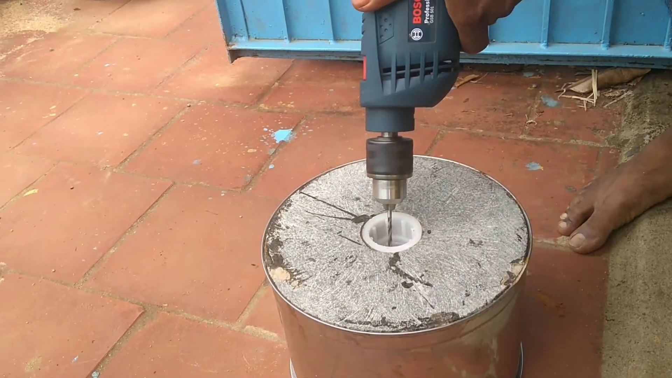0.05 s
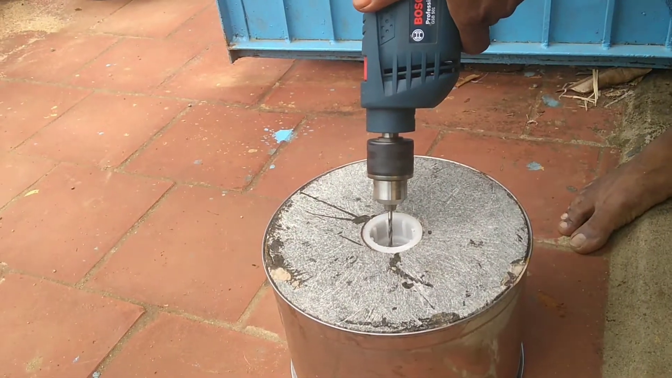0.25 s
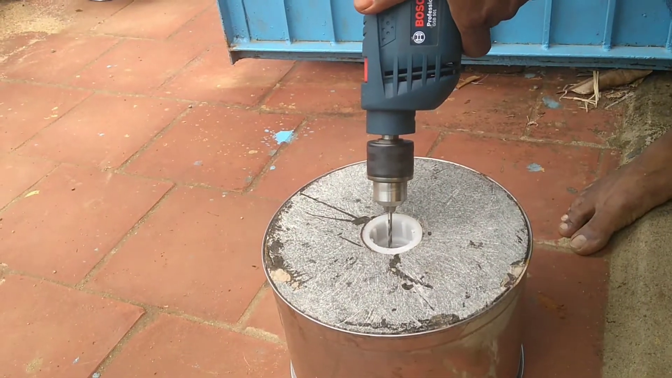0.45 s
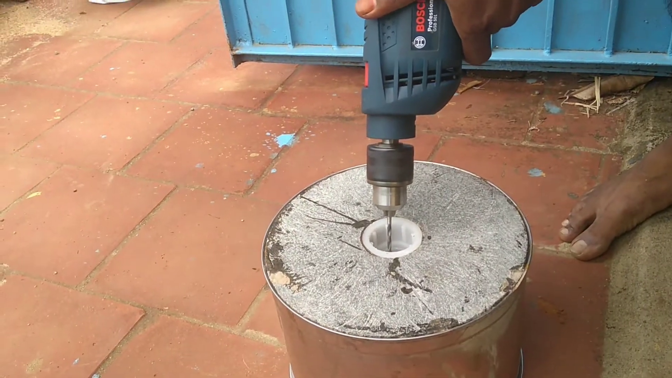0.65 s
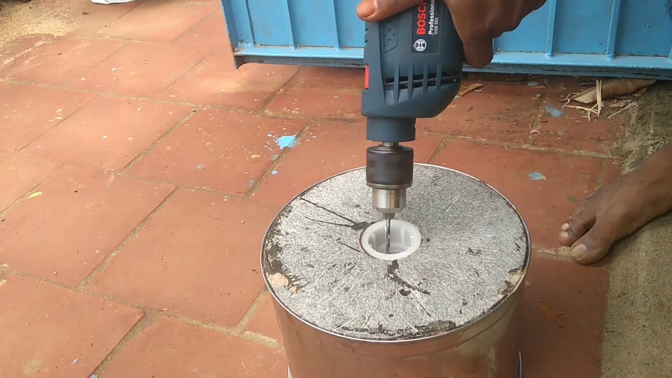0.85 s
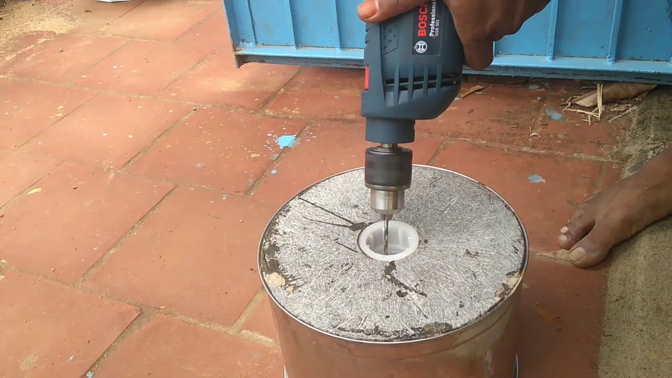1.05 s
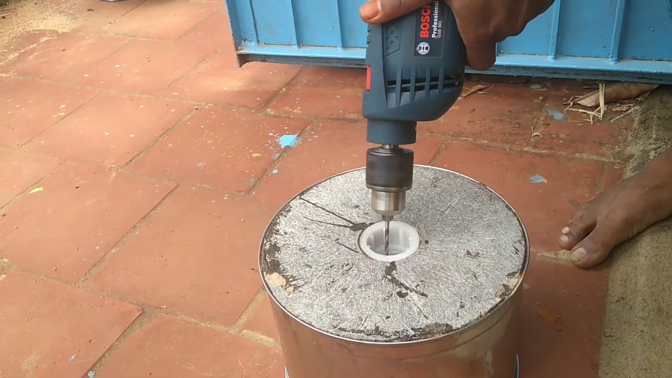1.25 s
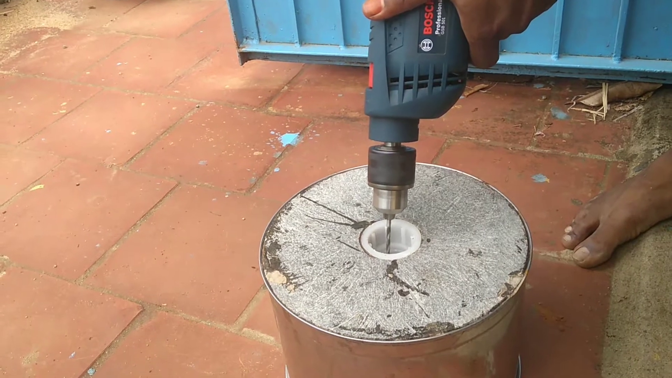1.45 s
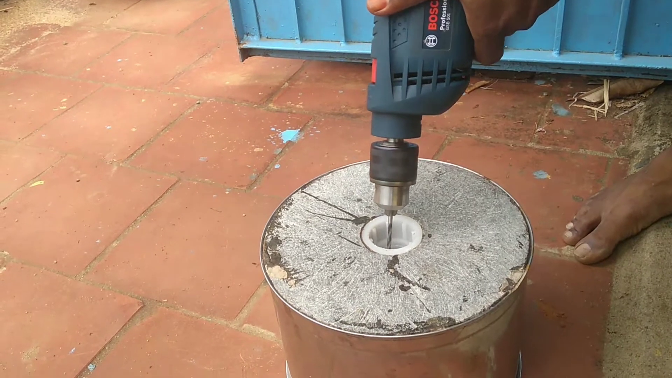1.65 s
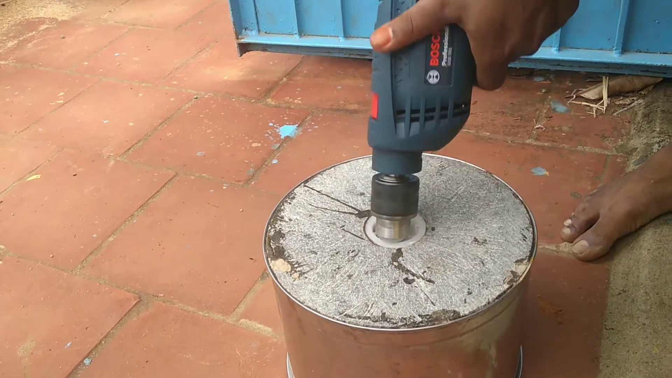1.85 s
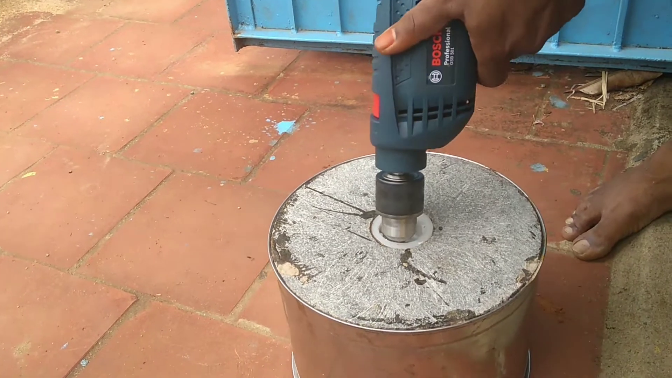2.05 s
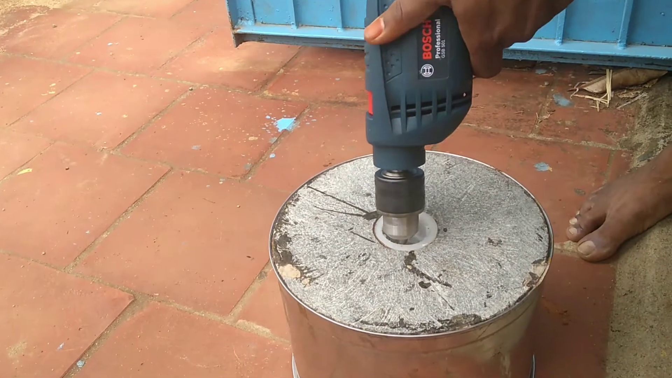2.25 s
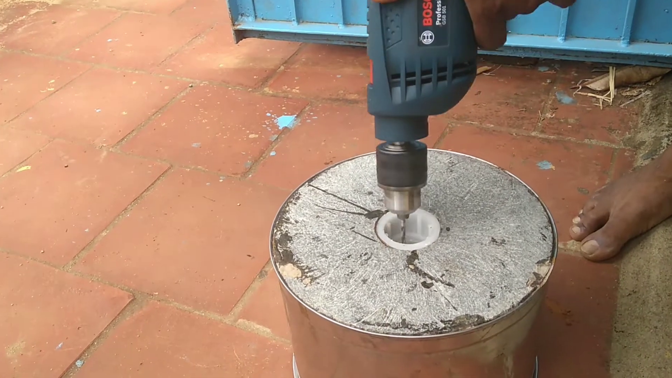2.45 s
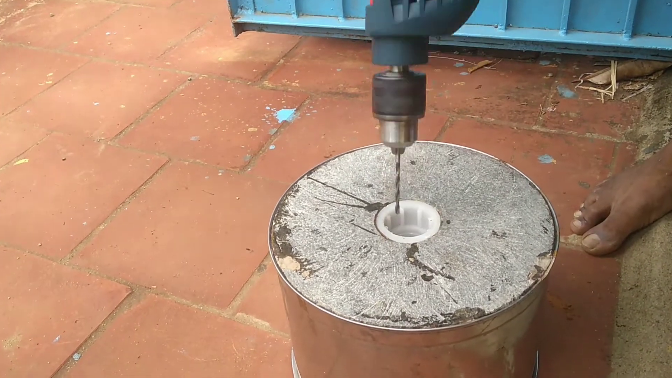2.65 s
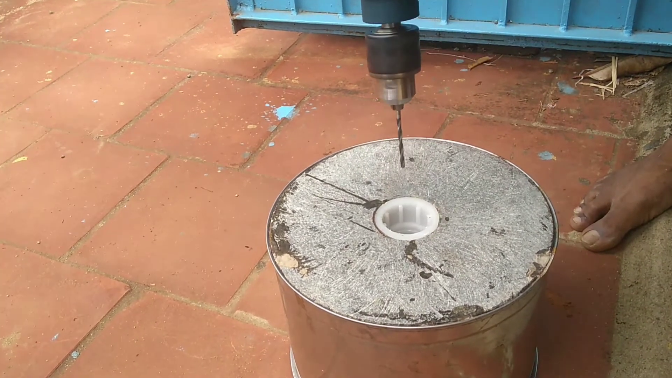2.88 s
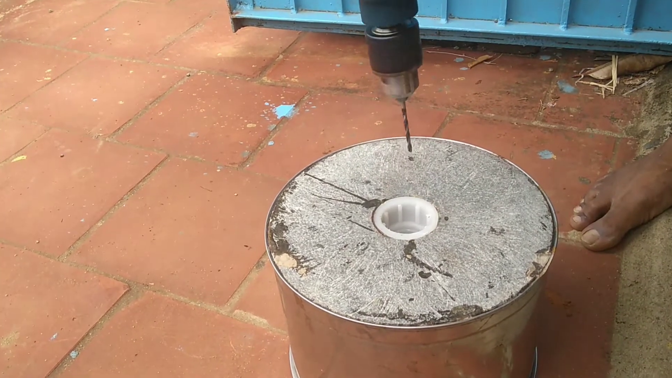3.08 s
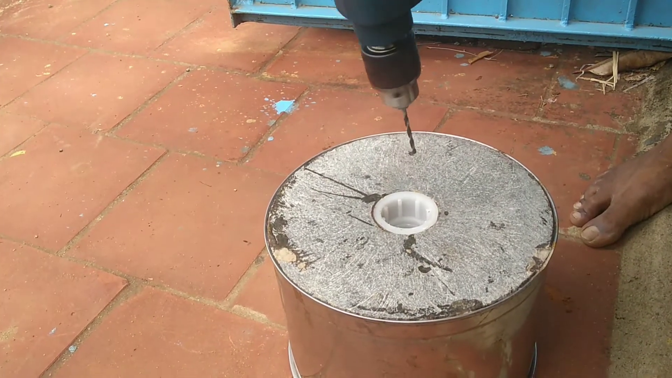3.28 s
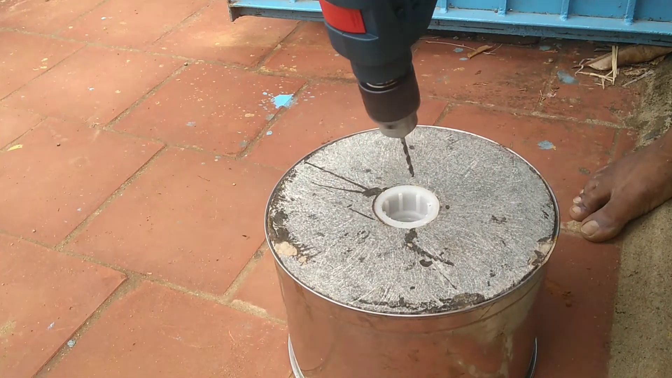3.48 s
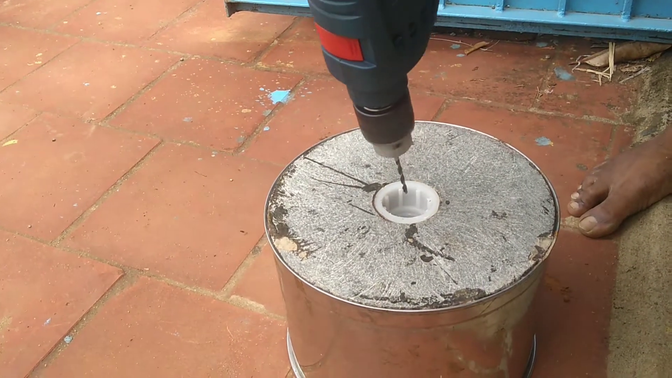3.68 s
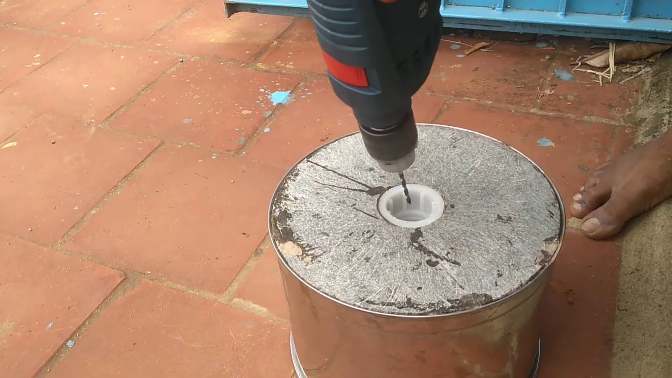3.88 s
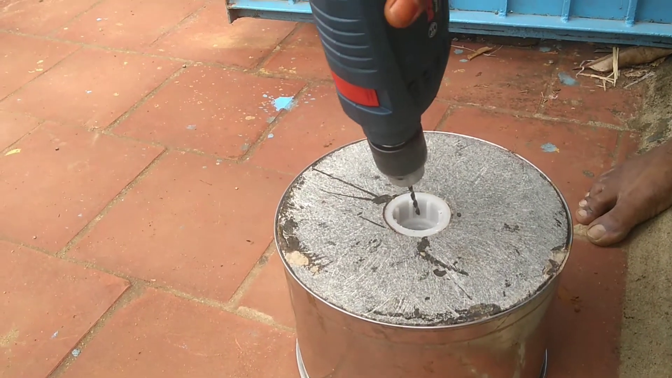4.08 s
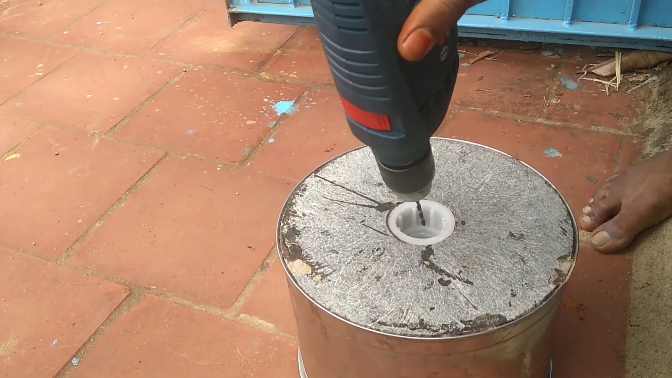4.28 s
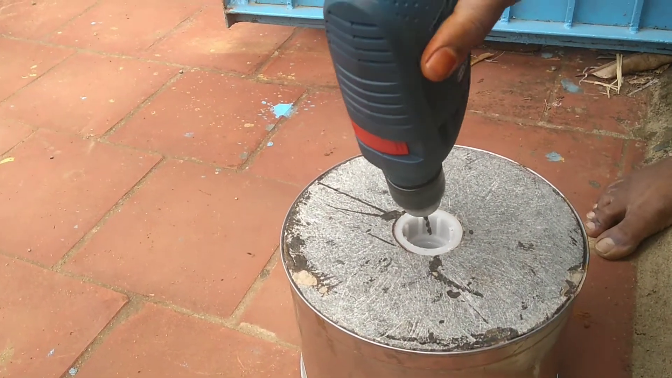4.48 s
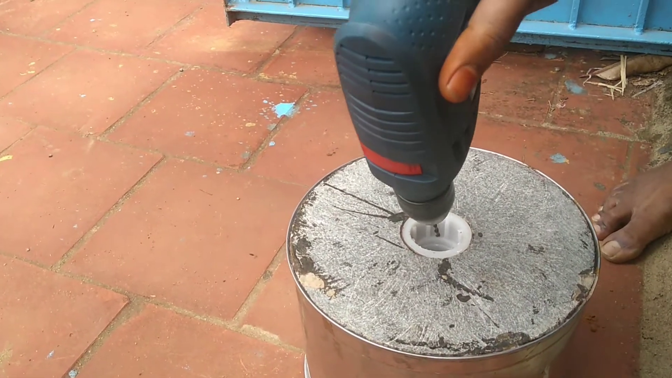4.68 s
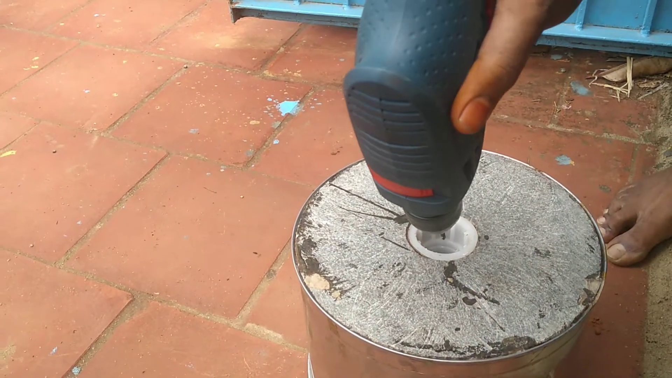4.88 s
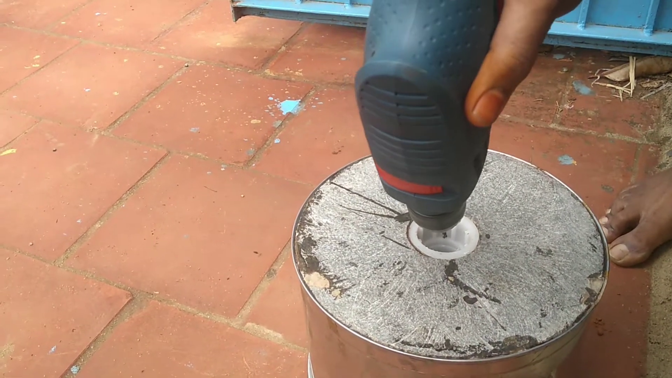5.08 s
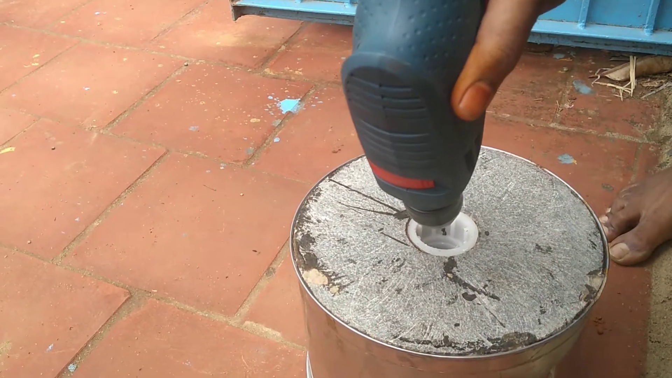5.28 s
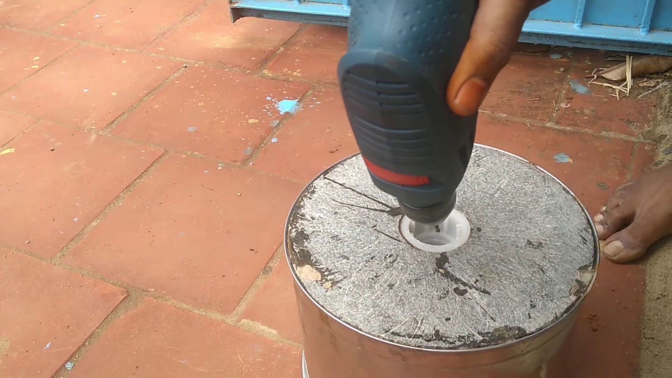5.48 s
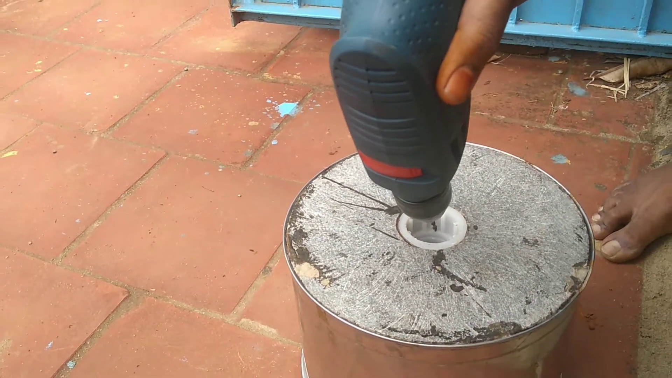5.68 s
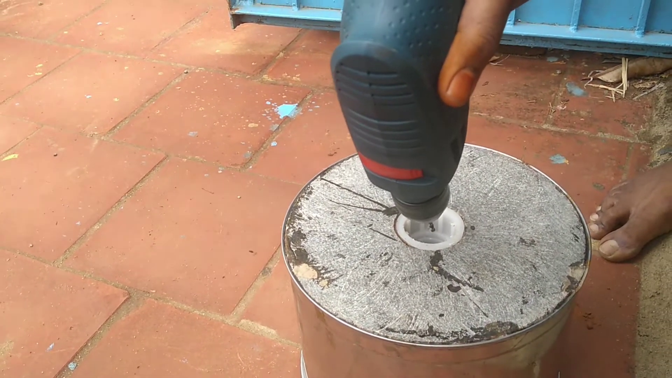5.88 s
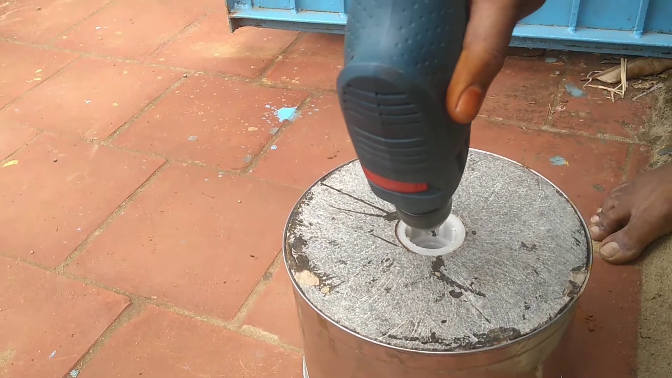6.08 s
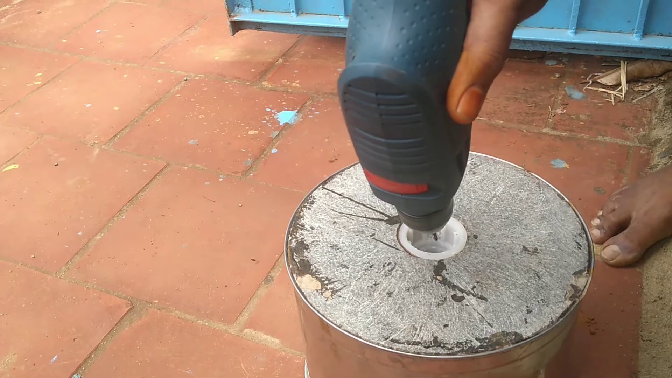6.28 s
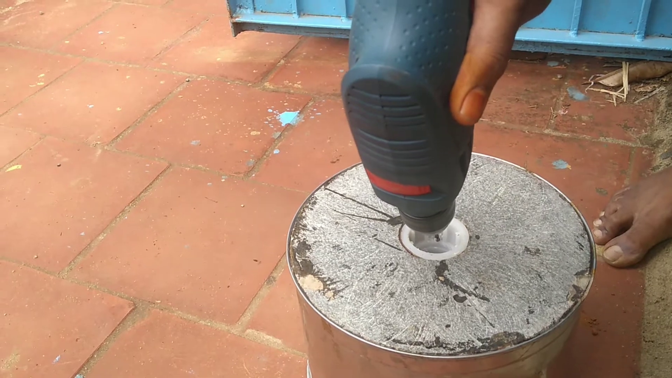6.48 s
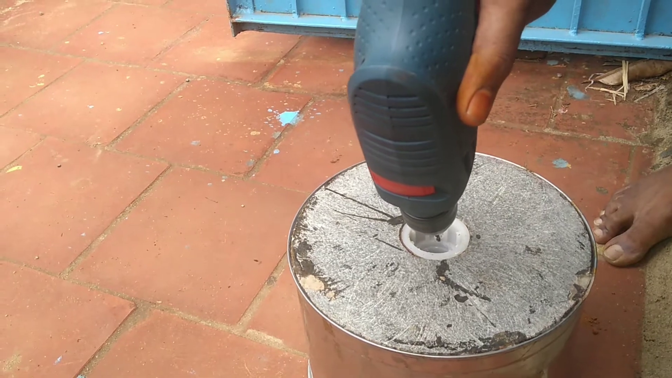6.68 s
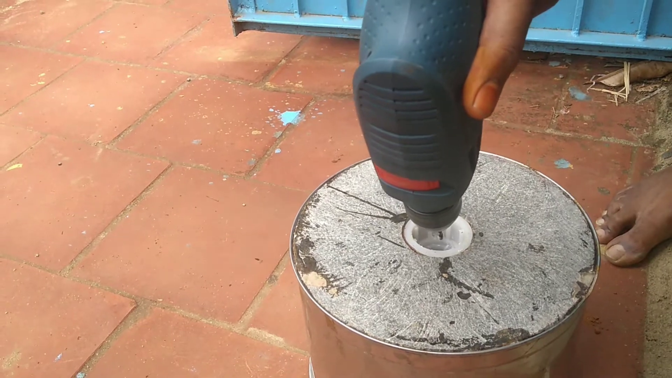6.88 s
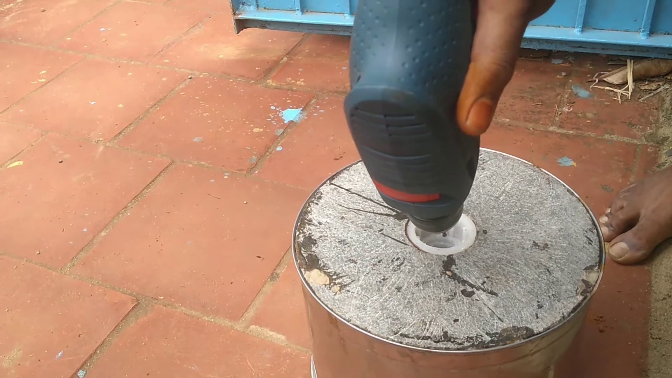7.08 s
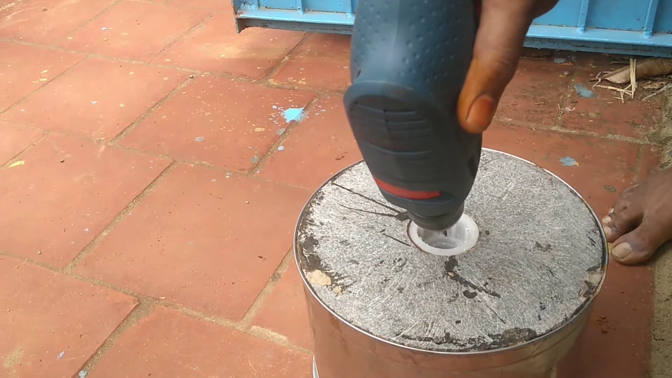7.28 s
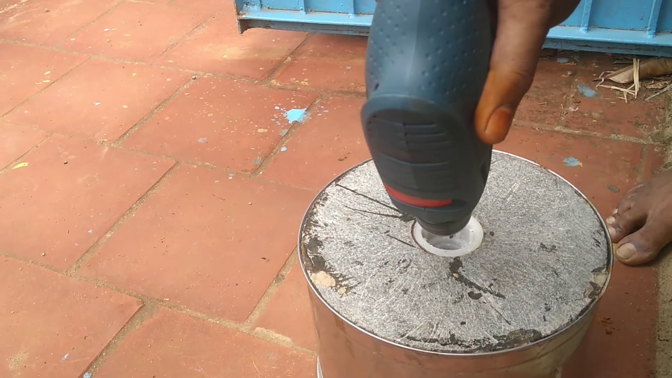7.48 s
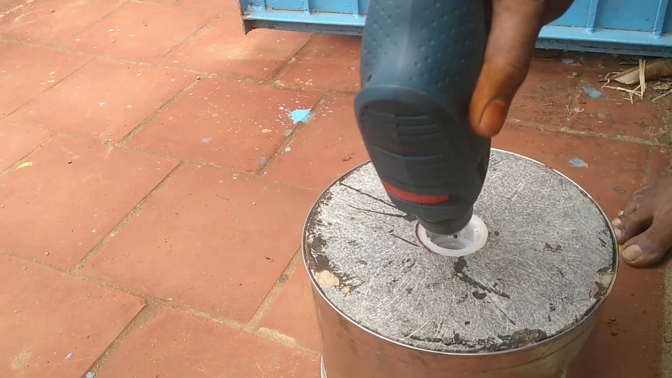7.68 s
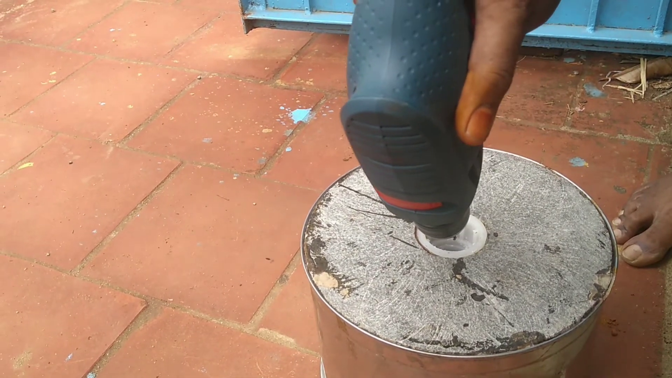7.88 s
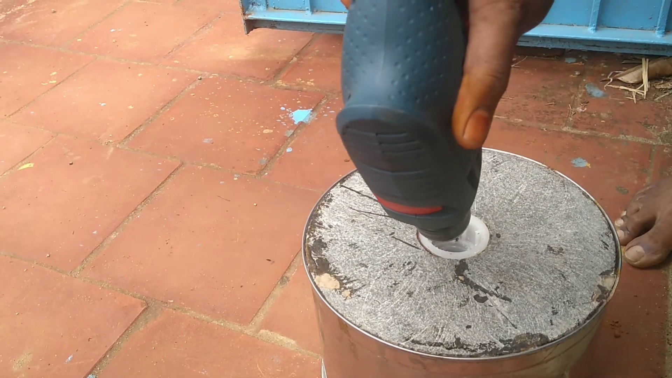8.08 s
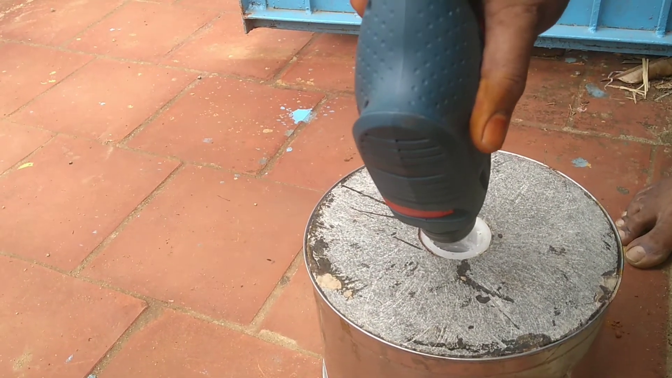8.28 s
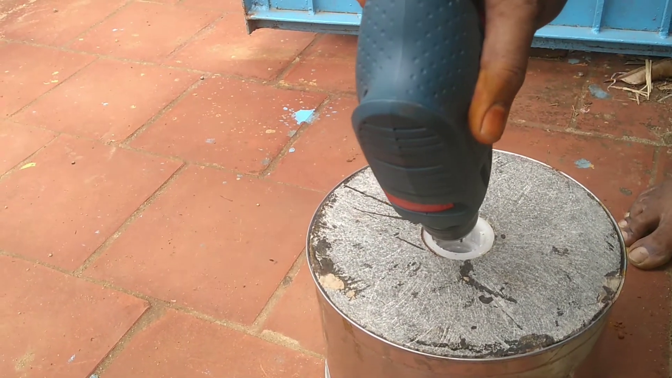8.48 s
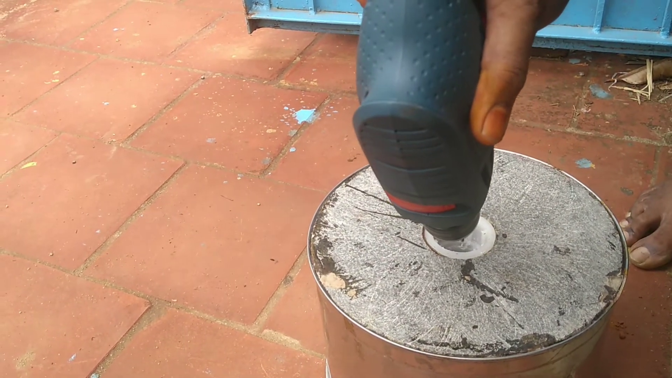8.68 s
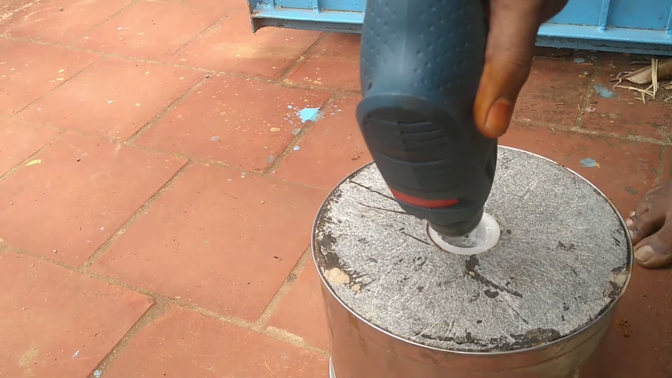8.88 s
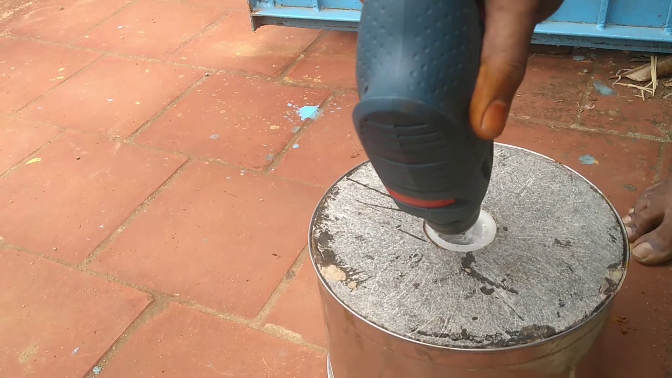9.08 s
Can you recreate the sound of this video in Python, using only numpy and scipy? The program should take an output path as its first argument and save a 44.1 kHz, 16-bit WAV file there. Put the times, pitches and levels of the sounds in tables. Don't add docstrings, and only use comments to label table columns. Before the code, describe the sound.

From the start a handheld electric drill runs fast about a metre from a phone: a dense midrange gear rattle, beating buzzy tones, high fan whine and hissing air, with the bit faintly scraping and ringing a hollow drum. Soft low wind thumps bump the microphone, mostly before 1.6 and around 2.8-3.0. Pitch rises slightly at 0.35 and sags at 1.4. At 1.8-2.1 the bit breaks through with dull lid knocks. At 2.3 the trigger is released; the whine glides steadily down and hiss fades, exposing purer gear tones, then brush ticks. From 3.9 to 4.9 it chatters in small jolts, with low lid knocks at 4.05-4.3, a faint hum and rasp, nearly quiet by 5. At 5.1-5.25 rapid buzzing kicks restart it; it races by 5.6, bores loudly, bogs down lower from 7.3, dips further near 8, then climbs again at 8.3 and runs to the end.

```python
import sys
import numpy as np
from scipy import signal
from scipy.fft import rfft, irfft, next_fast_len
from scipy.io import wavfile
from scipy.ndimage import uniform_filter1d, map_coordinates

SR = 44100
rng = np.random.default_rng(int(sys.argv[2]) if len(sys.argv) > 2 else 0)


def inscribe(sig):
    pcm = np.round(np.clip(np.atleast_2d(sig).T, -1, 1) * 32767)
    wavfile.write(sys.argv[1], SR, pcm.astype(np.int16))


def gain_from_db(level_db):
    decades = np.asarray(level_db, float) / 20
    return 10 ** decades


N = 403074
SPAN = next_fast_len(N)
TIME, FREQ = np.arange(N) / SR, np.arange(SPAN // 2 + 1) * SR / SPAN

PINION, WHEEL = 4, 41
CHUCK_RATIO = PINION / WHEEL
FULL_HZ, CRAWL_HZ = 420, 54.94
BREAK_THROUGH_S, RELEASE_S, TRIGGER_S = 1.8, 2.293, 5.2
KICK_S, KICK_GAP_S = 5.135, .0194
PORT_LAG_S = 17.4 / SR
RESTARTED = TIME > TRIGGER_S
COASTING = (TIME > RELEASE_S) & ~RESTARTED

# start in seconds, rotor speed pulled towards in Hz, settling time in seconds.
LOADS = [(0.0, 411.5, 0.083), (.35, 477.3, 0.24), (1.42, 399.5, .3), (1.92, 440.3, 0.26),
         (5.19, 259.6, 0.071), (5.285, 445, 0.13), (5.75, 395.4, 0.52), (7.0, 408.7, 0.31),
         (7.29, 264.6, .7), (8.08, 301.4, 0.079), (8.22, 320.1, 0.098), (8.28, 395.2, 0.31)]
# time in seconds, level in dB.
RATTLE_DB = [(0.0, -27), (.56, -29), (1.07, -23.5), (1.65, -27.5), (1.91, -25.5), (1.99, -32),
             (2.49, -28.5), (2.85, -31), (3.9, -30), (4.25, -32), (4.32, -35.5), (4.9, -38.5), (5.14, -46),
             (5.27, -24.5), (6.62, -22.5), (7.85, -26.5), (8.35, -24), (9.14, -23)]
# start in seconds, clean gear tone in dB, wobble 0-1,
# sidebands in dB, then over the rattle housing drone in dB, run-out 0-1, gear nose in dB, rear cap in dB.
STAGES = [(0, -12, 0.28, -2, -5.5, 0.83, -3.5, -1.5), (.55, -9, 0.16, -1.5, -6, 0.47, -8.5, -1),
          (1.7, -10, 0.39, -3, -6, 0.7, -8, -1.5), (2.4, -6, 0.06, -4, -3, 0.4, -3, -2.5),
          (3.2, -12, 0.3, -4, -2, 0.7, 0, -4), (3.87, -8.5, 0.52, -9, -3.5, .1, -1, -7),
          (4.3, -6.5, 0.32, -3.5, -0.5, 0.4, -1, -6), (4.8, -29, 0.4, -6, 0.5, 0.3, 4.5, -4.5),
          (5.25, -8, 0.24, 1.5, -4.5, 0.44, -3, -3.5), (5.6, -7, 0.34, -3.5, -6.5, .8, -7, -4),
          (6.2, -8.5, 0.28, -7.5, -5.5, 0.6, -5, -3.5), (7.05, -13, 0.27, -4, -4, .65, -4, -3.5),
          (7.5, -6, 0.27, -2, -4, 0.43, -1, -3), (8.3, -6.5, 0.16, -0.5, -4.5, 0.7, -3.5, -2)]
# time in seconds, boost in dB, half length in seconds.
CATCHES = [(0.338, 3, 0.018), (1.859, 1, 0.027), (3.545, 1, 0.028), (3.686, 2.5, 0.014), (3.756, 3, 0.017),
           (3.85, 2, .012), (3.924, 5.5, 0.009), (3.988, 5.5, 0.011), (4.05, 6, 0.0086),
           (4.105, 5.5, 0.016), (4.187, 4.5, 0.017), (4.24, 6.5, 0.009), (4.356, 5.5, 0.0085),
           (4.405, 1, 0.01), (4.552, 4.5, 0.017), (4.732, 6.5, 0.016), (4.774, 6.5, 0.0099),
           (4.853, 6, 0.013), (4.9, 4, 0.011), (5, 6, 0.016), (5.102, 3.5, 0.011), (5.137, 6, .005),
           (5.386, -1.5, 0.007), (5.67, 1, 0.031), (6.026, 0, 0.02), (6.207, 0.5, 0.031), (6.533, 0, 0.023),
           (7.031, 1.5, 0.035), (7.274, 3, 0.056), (7.69, 2, 0.037), (7.77, 4.5, .012), (7.8, -2.5, 0.029),
           (8.404, 1.8, 0.044), (8.614, -0.5, 0.021), (9.02, 0.5, 0.048)]
# multiple of rotor speed, dB pressed straight down, dB free or leaning.
MESH = [(2, -24, -9.5), (3, -8.5, -12), (4, 0.5, -12), (5, -2.5, -13), (7, -31, -11), (8, -6, -5.5),
        (9, -7, -9.5), (10, -25, -14.5), (11, -12, -9.5), (12, -4, -10.5), (13, -16.5, -17), (16, -22, -10),
        (20, -30, -7), (24, -14, -4.5), (28, -21, -8.5), (60, -25, -10), (72, -24, -3)]
# time in seconds, multiple of rotor speed, boost in dB, half length in seconds.
SINGS = [(1.1, 12, 6.5, 0.26), (1.052, 4, 0, .3), (1.5, 4, -3, 0.33), (2.5, 8, -1, .15),
         (3.154, 12, 7.5, 0.076), (3.9, 8, 0.5, 0.18), (3.65, 24, 6, .3), (3.55, 12, 6.5, .3),
         (4.3, 16, 5, .2), (4.55, 16, 1, .1), (1.6, 9, 0, .2), (8.05, 11, 4.5, 0.27), (8.9, 10, 6, .25),
         (5.24, 78, -30, .08), (4.8, 39, -18, 0.022), (5.26, 39, 5.5, .04), (4.3, 78, -10, .25),
         (3, 4, 5, 0.11), (3.93, 8, 6.5, 0.04), (4.05, 8, -3, .05), (4.1, 20, 9, .06),
         (4.197, 24, 6, 0.069), (4.202, 8, 7, 0.081), (4.26, 16, 14, 0.045), (5.2, 8, 2, .25),
         (3.05, 8, -2, .15), (3.6, 4, 8, 0.3), (7.3, 8, 3, 0.11), (4.6, 8, 7, 0.052), (4.8, 8, 0, .05),
         (4.8, 8, 2.5, 0.12), (5.6, 8, -0.5, 0.12), (5.3, 12, 6, 0.18), (6.6, 8, 4.5, .2),
         (7.8, 12, 4, 0.13), (7.755, 8, 3, 0.14), (7.9, 9, 4.5, .15), (8.0, 7, 3.5, .1), (8.4, 7, 14, .06),
         (8.448, 8, 3, 0.21), (8.35, 12, 5.5, .07), (8.65, 11, 5, 0.1), (8.8, 9, 1, 0.17), (9.05, 9, 0, .1),
         (9.05, 8, 1, 0.09), (8.6, 4, -10, 0.9), (8.7, 12, -10, .2), (9, 2, -6, 0.34), (8.7, 3, -10, 0.36)]
# multiple of rotor speed, dB pressed straight down, dB free or leaning.
FAN = [(39, -1, -2), (78, -17, -19), (117, -36, -39)]
# rotor speed in Hz, level in dB.
WHINE = [(60, -52), (90, -45), (135, -34), (180, -34), (215, -29), (280, -33.5), (304, -32.5), (322, -35),
         (358, -30.5), (400, -39)]
# multiple of rotor speed, dB pressed straight down, dB free or leaning.
BRUSH = [(36, -4, -4), (48, -6, 1), (60.6, 0, -1), (72, -5, -7), (83.4, -1, -14), (96.2, -4, -20)]
# pitch in Hz, width in Hz, level in dB.
DRONE = [(466, 250, -10.5), (712, 170, -4), (1084.5, 138, -1.5), (1296, 75, 1.5), (1488, 210, 0),
         (1868, 453, -1.5)]
# pitch in Hz, width in Hz, level in dB.
SHELL = [(2644, 313, -2), (2886, 338, 0), (3287, 618, 0), (3576, 335, 1)]
# pitch in Hz, width in Hz, level in dB.
NOSE = [(2185, 224, 1), (2446, 300, -2)]
# pitch in Hz, width in Hz, level in dB.
CAP = [(3833, 296, 0.5), (4360, 790, -2), (4938, 410, -4.5)]
# pitch in Hz, width in Hz, level in dB.
VENTS = [(5570, 1170, 1), (6562, 720, 6), (6954, 900, 3), (8990, 1460, -6)]
# time in seconds, pressure in dB, bearing on 0 lid to 1 shell.
BIT = [(0, -33.5, 0.35), (1.5, -40.5, 0.41), (1.8, -34, 0.26), (1.91, -25, 0.48), (2.12, -36, 0.32),
       (2.26, -28.5, 0.2), (2.72, -47, 0), (2.92, -34.5, 0.38), (3.1, -63, 0.4), (3.8, -52, 0),
       (3.9, -37, 0.18), (4.28, -31.5, 0.038), (4.4, -39, 0.54), (4.94, -27, 0.94), (5.27, -31.5, 0.57),
       (5.8, -37, 0.48), (7.03, -37.5, 0.66), (7.2, -35.5, 0.096), (8.32, -34.5, 0.69), (8.63, -39, 0.58)]
# pitch in Hz, width in Hz.
DRUM = [
    (188, 57),
    (285, 48),
    (575, 400),
]
# time in seconds, level in dB, pitch in Hz, upper tone in dB.
KNOCKS = [(1.876, -14, 201, -5), (1.903, -12, 237, -4.5), (1.918, -16, 230, 0), (1.988, -26, 227, -2.5),
          (2.073, -31, 200, 2), (4.055, -21, 185, -29), (4.109, -26.5, 180, -22), (4.182, -23, 187, -30),
          (4.236, -17.5, 190, -18), (4.29, -10.5, 188, -30), (7.448, -23, 224, -19)]
# time in seconds, level in dB.
KICKS = [(5.097, -37), (5.116, -35.5), (5.135, -24.5), (5.154, -31), (5.174, -23.5), (5.193, -21.5),
         (5.212, -22), (5.232, -21), (5.252, -21.5)]
# time in seconds, level in dB.
HUM = [
    (4.1, -79),
    (4.3, -47.5),
    (5.0, -34),
    (5.1, -38),
    (5.3, -68),
]
# time in seconds, level in dB, half length in seconds.
UNBALANCE = [(0, -37, .4), (1.617, -42.5, 0.76), (2.332, -41, 0.071), (3.5, -47.5, 0.5), (5.6, -41.5, 0.11),
             (6.05, -40.5, 0.44), (6.903, -37.5, 0.92), (9.0, -35.5, 0.5)]
# time in seconds, level in dB, half length in seconds.
FOUR_LOBES = [(2.32, -33, 0.15), (5.85, -37.5, 0.15), (6.7, -42.5, 0.19), (7.3, -47, 0.13)]
# time in seconds, level in dB, half length in seconds.
SIX_LOBES = [(1.8, -42, 0.25), (5.52, -28.5, 0.12), (7.0, -41, 0.34), (7.5, -40, 0.17), (8.4, -41, 0.14)]
# time in seconds, level in dB, half length in seconds.
RASP = [
    (4.75, -48.5, 0.53),
    (5.22, -40, 0.053),
]
# time in seconds, level in dB, half length in seconds.
GUSTS = [(0.0, -36.5, 0.29), (.8, -42.5, 0.6), (1.8, -46, 0.26), (2.9, -37.5, 0.16), (4.6, -51, 0.49),
         (8.5, -65.5, 0.74)]
# time in seconds, level in dB, pitch in Hz.
BUFFETS = [(0.092, -8, 200), (0.123, -10, 239), (0.144, -16, 142), (0.174, -10, 192), (0.33, -12, 164),
           (0.362, -4.5, 227), (0.472, -3.5, 189), (0.59, -25, 161), (0.726, -24, 182), (0.761, -14, 190),
           (1.005, -18, 140), (1.047, -13, 270.3), (1.174, -16.5, 157.8), (1.226, -20, 192),
           (1.482, -17, 186.6), (1.563, -11.5, 209), (1.767, -17, 180.5), (1.787, -15, 239.3),
           (2.042, -11.5, 272), (2.775, -16, 170), (2.83, -4, 181), (2.911, -4, 340), (2.935, -6, 167.4),
           (2.963, -20, 180.8), (3.014, -26, 170)]
# pitch in Hz, level in dB, likeness 0-1, extra lag in radians.
PORT = [(60, -35, 0.1, 0), (200, -10, 1, 0.34), (412, -7.5, 1, 0.39), (780, -1.5, 0.78, 0.43),
        (1076, -0.5, 1, 0.57), (1260, 0.8, 0.96, 0.12), (1830, -0.7, 0.69, 0.46), (2100, -1.5, 0.8, 0.6),
        (2152, 1.5, 0.98, 0.82), (2450, -2.5, 0.97, 0.38), (2580, -0.5, 0.75, 0.52),
        (3030, -5.5, 0.8, 0.87), (3590, -2, 0.99, 0.4), (4130, -3, 0.9, 0.58), (6000, -8, 0.71, 0.68),
        (8540, -8.5, 0.44, 0.51), (11600, -10.5, 0.16, 0.093), (12200, -10.5, .5, 0), (13000, -22, 0.5, .2)]


def speed():
    balance_hz, drag_per_s = 340, .271
    hz = np.full(N, 420.5)
    for s, goal, settle in sorted(LOADS + [(RELEASE_S, 0, 0)]):
        i = int(s * SR)
        since, was = TIME[i:] - TIME[i], hz[i]
        if settle:
            hz[i:] = goal + (was - goal) * np.exp(-since / settle)
        else:
            angle = np.maximum(np.arctan(was / balance_hz) - drag_per_s * since, 0)
            hz[i:] = np.maximum(balance_hz * np.tan(angle), CRAWL_HZ)
    starting = (TIME > KICK_S) & (TIME < KICK_S + 8 * KICK_GAP_S)
    cycle = ((TIME - KICK_S) / KICK_GAP_S + .1) % 1
    held_back = KICK_GAP_S * (np.clip(cycle / .3, 0, 1) - cycle - .35) * starting
    return np.interp(TIME + held_back, TIME, hz)


def motor(turns, hz):
    rattle_db = columns(RATTLE_DB)[0]
    clean_db, wobble, sideband_db, drone_db, runout, nose_db, cap_db = held(STAGES)
    jolt_db = sum(db * bell(s, half) for s, db, half in CATCHES)
    octaves = np.log2(hz / FULL_HZ)
    air_db = rattle_db + 0.75 * jolt_db - 6.5 + 1.5 * octaves - 3 * RESTARTED
    sizzle_db = rattle_db + 0.46 * jolt_db - 4.5 + 6 * octaves - 2 * RESTARTED + 2 * COASTING
    gears = gear_noise(turns, hz, clean_db, wobble, sideband_db, runout)
    parts = (0, SHELL), (nose_db, NOSE), (cap_db, CAP)
    case = gain_from_db(rattle_db + jolt_db + 1.5) * sum(gain_from_db(db) * unit(ring(gears, part)) for db, part in parts)
    case += gain_from_db(drone_db + rattle_db + 0.9 * jolt_db + 3.5) * unit(ring(gears, DRONE))
    case += gain_from_db(air_db + 6.5) * cooling_air(gears)
    case += gain_from_db(sizzle_db + 2.0) * brush_sparks(gears, octaves)
    case += fan_whine(turns, hz)
    case += gain_from_db(air_db + 4) * brush_ticks(turns, hz)
    return signal.sosfilt(signal.butter(6, 450, "high", fs=SR, output="sos"), case)


def gear_noise(turns, hz, clean_db, wobble, sideband_db, runout):
    chuck_angle = 2 * np.pi * turns * CHUCK_RATIO
    depth = .4 * runout * np.clip(0.43 + 0.076 * walk(11.0), 0, 1)
    load = 1 + depth * np.cos(chuck_angle + 4.8 * walk(4))
    slap = 7 * np.clip(wobble, 0, 1) ** 2 * np.exp(-(turns % 1) / .15)
    teeth = .5 + np.exp(-(turns * PINION % 1) / .3) + slap
    rattle = unit(teeth * rng.standard_normal(N)) * load * gain_from_db(0.97 * walk(14))
    blur = np.where(COASTING, .35, np.where(TIME > 7.4, .55, 1))
    slack = turns + .013 * blur * np.sqrt(hz / FULL_HZ) * walk(90)
    beat = 1 + np.clip(runout * blur, 0, 1) * np.cos(chuck_angle + .8 * walk(9))
    tones = orders(slack, hz, MESH, sideband_db, flutter_db=1.8, rate=16.)
    return rattle + gain_from_db(clean_db - 3) * beat * tones


def orders(turns, hz, table, off_mesh_db, flutter_db, rate):
    lean = np.clip((TIME - BREAK_THROUGH_S) / .1, 0, 1)
    out = np.zeros(N)
    for k, straight_db, free_db in table:
        level_db = straight_db + lean * (free_db - straight_db) + flutter_db * walk(rate)
        if round(k) % PINION > 0:
            level_db = level_db + off_mesh_db
        for s, multiple, db, half in SINGS:
            if round(multiple) == round(k):
                level_db = level_db + db * bell(s, half)
        audible = k * hz < .45 * SR
        out += gain_from_db(level_db) * audible * np.sin(2 * np.pi * (round(k) * turns + rng.random()))
    return out


def fan_whine(turns, hz):
    starting = (TIME > KICK_S) * (TIME < 5.3)
    whine_db = np.interp(hz, *np.transpose(WHINE)) - 3 * starting
    trembling = turns + .006 * hz / FULL_HZ * walk(110)
    return gain_from_db(whine_db + 6) * orders(trembling, hz, FAN, 0, flutter_db=3.4, rate=30.)


def cooling_air(gears):
    return unit(ring(0.5 * gears + 0.4 * rng.standard_normal(N), VENTS))


def brush_sparks(gears, octaves):
    sizzle = ring(ring(0.23 * gears + rng.standard_normal(N), [(8890, 4400, 0)]), [(8780, 7000, 0)])
    sheen = ring(ring(rng.standard_normal(N), [(13100, 7000, 0)]), [(13000, 6400, 0)])
    sheen_db = -10.5 + 6 * octaves - 9 * COASTING + 1.7 * walk(18)
    return (unit(sizzle) + gain_from_db(sheen_db) * unit(sheen)) * gain_from_db(1.3 * walk(13))


def brush_ticks(turns, hz):
    slowing = np.clip(1 - hz / 190, 0, 1) * (TIME < KICK_S)
    moving = np.clip(hz / CRAWL_HZ - 1, 0, .4) / .4
    return slowing * moving * orders(turns, hz, BRUSH, 0, flutter_db=4., rate=12.)


def drum(turns):
    out = bit_scrape(turns) + lid_knocks()
    out = signal.sosfilt(signal.butter(1, 120, "high", fs=SR, output="sos"), out)
    hum = gain_from_db(columns(HUM)[0] + 1.2 * walk(22)) * np.sin(2 * np.pi * 481 * TIME)
    return out + hum + start_kicks()


def bit_scrape(turns):
    unseated_db = -23.5
    place = [TIME * 15, turns * CHUCK_RATIO % 1 * 64]
    bumps = map_coordinates(rng.standard_normal((140, 64)), place, order=1, mode="grid-wrap")
    grit = unit(ring(rng.standard_normal(N), [(300, 900, 0)])) * gain_from_db(2.6 * walk(25))
    scrape = unit(bumps) + .8 * grit
    press_db, seat = columns(BIT)
    lid = gain_from_db(press_db + unseated_db * np.clip(2 * seat - 1, 0, 1))
    shell = gain_from_db(press_db + unseated_db * np.clip(1 - 2 * seat, 0, 1))
    upper = shell * gain_from_db(-8.5) + gain_from_db(-45.5)
    out = np.zeros(N)
    for gain, (hz, width) in zip((lid, shell, upper), DRUM):
        once = ring(scrape, [(hz, width, 0)])
        out += gain * gain_from_db(3.0) * unit(ring(once, [(hz, 1.18 * width, 0)]))
    return out


def lid_knocks():
    out, t = np.zeros(N), TIME[:6000]
    for s, db, hz, upper_db in KNOCKS:
        low = np.sin(2 * np.pi * hz * t) * np.exp(-t / 0.014)
        high = gain_from_db(upper_db) * np.sin(2 * np.pi * DRUM[2][0] * t) * np.exp(-t / 0.019)
        add(out, s, gain_from_db(db + 8.0) * (low + high) * (1 - np.exp(-t / 0.0014)))
    return out


def start_kicks():
    kicks, t = np.zeros(N), TIME[:6000]
    for s, db in KICKS:
        burst = rng.standard_normal(len(t)) * np.exp(-t / 0.0091)
        click = 1.7 * np.exp(-t / 0.00015)
        add(kicks, s - .0006, gain_from_db(db) * (burst + click))
    deep = ring(kicks, [(280, 200, 0.84), (705, 500, -1.2)] + DRONE)
    bright = ring(ring(kicks, NOSE + SHELL + VENTS), [(2500, 6100, 0)])
    return 5.5 * deep + 1.7 * bright


def shake(turns):
    out = np.zeros(N)
    for k, table in (1, UNBALANCE), (4 * CHUCK_RATIO, FOUR_LOBES), (6 * CHUCK_RATIO, SIX_LOBES):
        out += spells(table, calm_db=-61) * gain_from_db(3.0 + 1.8 * walk(12)) * np.sin(2 * np.pi * k * turns)
    return out


def wind():
    gust_db = 20 * np.log10(spells(GUSTS, calm_db=-55.5))
    ragged_db = np.clip(5.5 + .3 * (gust_db + 36), 2.2, 5.5)
    rumble = unit(ring(ring(rng.standard_normal(N), [(145, 230, 0)]), [(108, 110, 0)]))
    out = gain_from_db(gust_db + 7.5 + ragged_db * walk(45)) * rumble
    t = TIME[:1764] - .02
    for s, db, hz in BUFFETS:
        turn = rng.random()
        swing = np.cos(2 * np.pi * (hz * t * (1 - 12 * t) + 0.11 * turn))
        swing += 0.44 * np.cos(2 * np.pi * (1.61 * hz * t + turn))
        add(out, s - .02, gain_from_db(db - 1.2) * swing * np.exp(-abs(t * hz / .75) ** 1.3))
    return out


def yard_and_rasp():
    noise = unit(ring(rng.standard_normal(N), [(2220, 340, 9.0), (13300, 700, -12), (15500, 320, -11)]))
    return noise * spells(RASP, calm_db=-63) * gain_from_db(2.4 * walk(5.2))


def yard_floor():
    return gain_from_db(-59) * unit(ring(rng.standard_normal(N), [(120, 200, 0), (700, 600, -6)]))


def ports(x):
    hz, *rest = np.transpose(PORT)
    db, alike, lag = (np.interp(np.log(FREQ + 1), np.log(hz), c) for c in rest)
    t = TIME[:8000]
    echoes = rfft(rng.standard_normal(len(t)) * np.exp(-t / .025), SPAN)
    echoes /= np.sqrt(uniform_filter1d(abs(echoes) ** 2, size=N // 100))
    alike, heard = np.clip(alike, 0, 1), rfft(x, SPAN) * gain_from_db(db)
    direct = alike * np.exp(-1j * (2 * np.pi * FREQ * PORT_LAG_S + lag))
    bounced = np.sqrt(1 - alike ** 2) * echoes
    near, even, odd = (irfft(heard * path, SPAN)[:N] for path in (direct, bounced, 1j * bounced))
    sway = 2.58 * walk(9)
    return np.array([near + even * np.cos(sway) + odd * np.sin(sway), x])


def columns(table):
    s, *rest = np.transpose(table)
    return [np.interp(TIME, s, c) for c in rest]


def held(table):
    s, *rest = np.transpose(table)
    row = np.searchsorted(s[1:], TIME)
    return [uniform_filter1d(c[row], size=int(.08 * SR)) for c in rest]


def bell(s, half):
    return np.exp(-((TIME - s) / half) ** 2)


def spells(table, calm_db):
    return gain_from_db(calm_db) + sum(gain_from_db(db) * bell(s, half) for s, db, half in table)


def walk(rate):
    k = int(SR / rate)
    steps = np.repeat(rng.standard_normal(N // k + 1), k)
    return unit(uniform_filter1d(uniform_filter1d(steps, k), k)[:N])


def unit(x):
    return x / np.sqrt(np.mean(x ** 2))


def ring(x, modes):
    shape = 0
    for k, (hz, width, db) in enumerate(modes):
        damping = 1j * width * FREQ
        shape = shape + (-1) ** k * gain_from_db(db) * damping / (hz ** 2 - FREQ ** 2 + damping)
    return irfft(rfft(x, SPAN) * shape, SPAN)[:N]


def add(out, s, burst):
    i = max(int(s * SR), 0)
    out[i:i + len(burst)] += burst[:N - i]


def scene():
    hz = speed()
    turns = np.cumsum(hz) / SR
    through_air = ports(motor(turns, hz) + drum(turns) + shake(turns) + yard_floor())
    gusts = wind()
    late = np.roll(gusts, round(PORT_LAG_S * SR))
    around = np.array([yard_and_rasp(), yard_and_rasp()])
    return through_air + np.array([late, gusts]) + around


def masked(x):
    size, width = 2048, 16
    from_hz, under_tone_db, slope_db, under_din_db, sparse_db = 6500, 22, 1.2, 49, 2
    hz, _, z = signal.stft(x, SR, "cosine", size)
    db = 10 * np.log10(abs(z[:, :-1]) ** 2 + 1e-20)
    bands = db.reshape(2, -1, width, db.shape[-1])
    top = bands.max(axis=(0, 2))
    mean = 10 * np.log10((gain_from_db(bands) ** 2).mean(axis=2))
    k = np.arange(bands.shape[1])[:, None]
    up = np.maximum.accumulate(top + slope_db * k, axis=0) - slope_db * k
    under_tone = uniform_filter1d(up, size=7) - under_tone_db + .35 * (k - 36)
    din = 10 * np.log10((abs(z[:, hz > 500]) ** 2).sum(axis=1).mean(axis=0) + 1e-20)
    hidden = np.maximum(under_tone, din - under_din_db) + 3.6 * rng.standard_normal(mean.shape)
    keep = np.repeat(mean > hidden, width, axis=1) & (db > np.repeat(hidden, width, axis=1) - sparse_db)
    z[:, :-1] *= keep | (hz[:-1, None] < from_hz)
    return signal.istft(z, SR, "cosine", size)[1][:, :N]


def top_cut(x):
    return signal.sosfilt(signal.butter(12, 15500, fs=SR, output="sos"), x)


def record(dry):
    wired = dry * np.array([[-1], [1]])
    wired = signal.sosfilt(signal.butter(2, 48, "highpass", fs=SR, output="sos"), wired)
    mix = masked(wired)
    return top_cut(mix)


dry = scene()
out = record(dry)
inscribe(out)
```